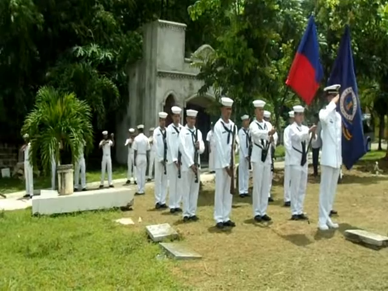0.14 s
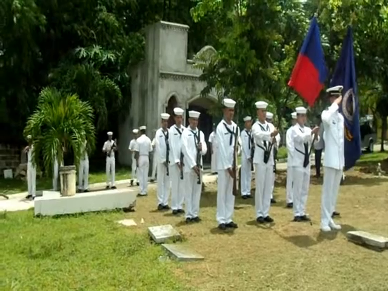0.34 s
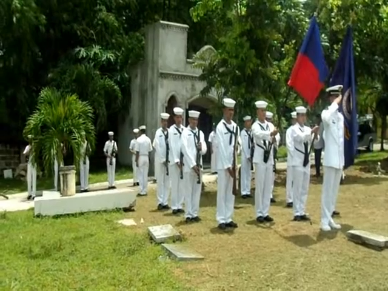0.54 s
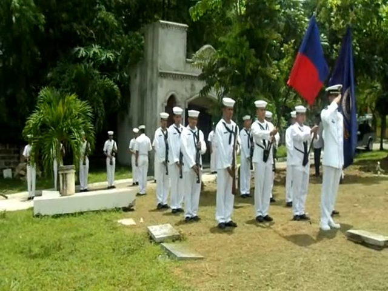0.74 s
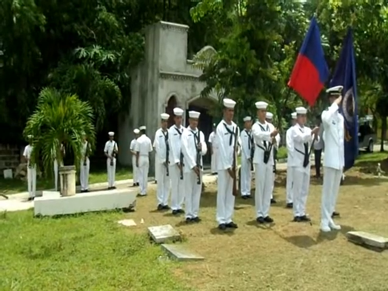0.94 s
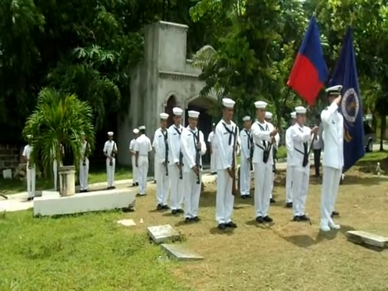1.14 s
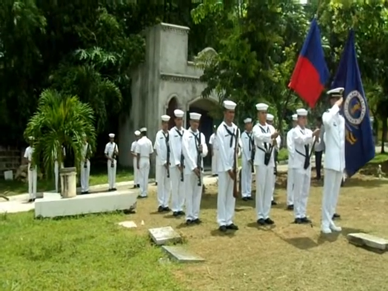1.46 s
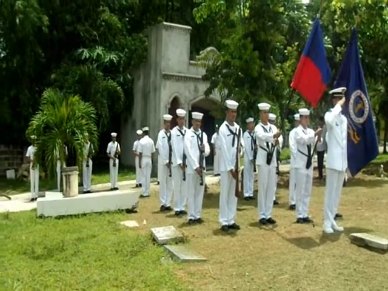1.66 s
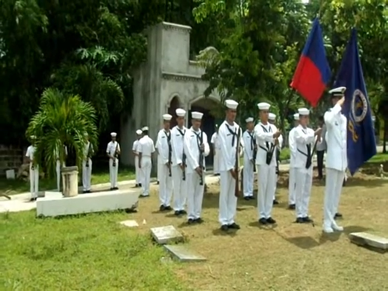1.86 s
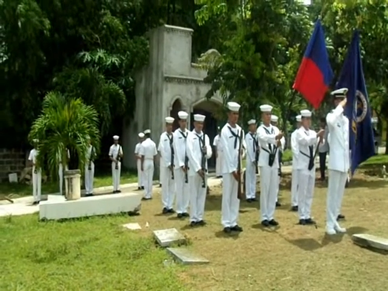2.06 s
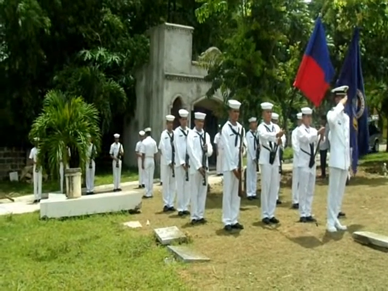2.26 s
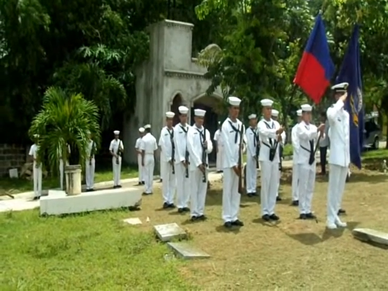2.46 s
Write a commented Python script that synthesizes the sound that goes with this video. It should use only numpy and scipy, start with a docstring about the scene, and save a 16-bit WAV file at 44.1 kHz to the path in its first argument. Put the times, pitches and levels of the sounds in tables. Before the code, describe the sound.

Three rifles fire almost as one on an open lawn, flattened and slightly dull at a small microphone; dense echoes die away, a bolt rattles, and quiet air remains with distant bird notes and insects.

```python
"""Three rifles fire almost together on a lawn, each blast a push and suction of air that overloads the microphone.
Near trees, then buildings and a far tree line scatter them back as clumpy noise; flat walls slap singly.
A bolt is worked afterwards: bursts of noise ring its steel resonances.
Behind lie filtered-noise wind rumble and hiss, a trilling and a chirping cricket, and two faint bird notes."""
import sys
import numpy as np
from scipy import signal
from scipy.fft import rfft, irfft, next_fast_len
from scipy.io import wavfile
from scipy.ndimage import uniform_filter1d, map_coordinates

SR = 44100
rng = np.random.default_rng(int(sys.argv[2]) if len(sys.argv) > 2 else 0)


def gain_from_db(level_db):
    """Convert decibel levels to linear amplitude factors (20 dB per decade)."""
    decades = np.asarray(level_db, float) / 20
    return 10 ** decades


def transcribe(signal):
    """Save signal, clipped to [-1, 1], as a 16-bit WAV file at the path in sys.argv[1]."""
    frames = np.atleast_2d(signal).T
    limited = np.clip(frames, -1, 1)
    pcm = np.round(limited * 32767).astype(np.int16)
    wavfile.write(sys.argv[1], SR, pcm)


N = 114660
T = np.arange(N) / SR

# the three muzzle blasts at the microphone: start_s, push_level_db, push_length_ms
SHOTS = [(.2074, 6, 1.1), (.2187, 1, 1.5), (.2496, 3, .6)]
# spectrum of the blast as it comes back: frequency_hz, density_db (per Hz)
BLAST_SPECTRUM = [(40, -12.5), (100, -3.5), (290, 0.5), (510, -5.5), (900, 2.5), (1600, -4), (2700, -3.5),
                  (4700, -1.5), (9000, -8.5)]


def unit(x):
    """Scales to rms 1."""
    return x / np.sqrt(np.mean(x ** 2) + 1e-20)


def along(points, hz):
    """Reads a curve of (frequency, value) points on a log frequency axis."""
    f, v = np.transpose(points)
    return np.interp(np.log(hz + 1), np.log(f + 1), v)


def wobble(rate):
    """A smooth random curve with rate knots a second."""
    return map_coordinates(rng.standard_normal(int(N * rate / SR) + 4), [T * rate])


def filtered(x, response):
    """Shapes the spectrum of x by a function of frequency in Hz."""
    m = next_fast_len(N + SR // 2)
    return irfft(rfft(x, m) * response(np.fft.rfftfreq(m, 1 / SR)), m)[..., :N]


def patchy(patchy_db):
    """White noise whose gain varies in random patches of time and frequency."""
    z = signal.stft(rng.standard_normal(N), nperseg=512)[2]
    field = rng.standard_normal(z.shape)
    for axis in (0, 1):
        field = uniform_filter1d(field, size=5, axis=axis)
    return unit(signal.istft(z * gain_from_db(patchy_db * unit(field)), nperseg=512)[1][:N])


def burst(s, t60, swell=0.00038):
    """Envelope that swells from time s and dies away by 60 dB in t60 seconds."""
    t = np.maximum(T - s, 0)
    return (1 - np.exp(-(t / swell) ** 2)) * gain_from_db(-60 * t / t60)


def blasts():
    """Each muzzle blast is a sudden push of air, then suction; once direct, once off the ground."""
    suction = .65  # share of the push
    paths = [(0, 0), (.0017, -2)]  # direct, ground bounce: (delay s, level dB)
    out = np.zeros(N)
    for start_s, level_db, length_ms in SHOTS:
        for delay_s, path_db in paths:
            s = start_s + delay_s
            v = np.maximum(T - s, 0) / (length_ms / 1000)  # time in push lengths
            pulse = (T >= s) * (1 - suction * v) * np.exp(-v)
            out += gain_from_db(level_db + path_db) * pulse
    return out


def scattered():
    """Trees and buildings return every blast as clumpy noise, with treble losses set for each."""
    # groups of scatterers; levels relative to each shot:
    # delay_s, swell_s, level_db, t60_s, treble_loss_db_per_khz, lowest_hz
    scatterers = [(.0002, .003, -9.5, 0.32, 0, 150), (.112, 0.013, -20, .6, 0, 150),
                  (.18, 0.024, -22, .6, 0.5, 90), (.3, 0.088, -36, 1.027, 2, 150),
                  (.52, 0.043, -40.5, .7, 7.5, 700), (.5, 0.16, -51, 1.7, 3.5, 1010)]
    clumpy_db, clumps_per_s = 1.2, 200
    out = np.zeros(N)
    for delay, swell, db, t60, loss_db, low_hz in scatterers:
        # the three returns add as powers
        power = sum((gain_from_db(shot_db) * burst(s + delay, t60, swell)) ** 2 for s, shot_db, _ in SHOTS)

        def response(hz):
            low_cut = hz / np.hypot(hz, low_hz)
            return gain_from_db(along(BLAST_SPECTRUM, hz) - loss_db * hz / 1000) * low_cut

        noise = unit(filtered(patchy(1.5), response))
        out += gain_from_db(db + clumpy_db * wobble(clumps_per_s)) * np.sqrt(power) * noise
    return out


def wall_slaps():
    """Flat walls give single echoes: a short noise burst over a low, fast-dying tone."""
    # single echoes: start_s, level_db
    slap_times = [(.267, -11), (.329, -17), (.349, -14), (.357, -15), (.396, -11), (.414, -14), (.431, -14),
                  (.447, -12)]
    slap_t60 = .03  # s
    boom_db, boom_hz, boom_t60 = -7, 202, 0.044  # low end: dB relative to the slap, Hz, s
    booms = np.zeros(N)
    envelope = np.zeros(N)
    for s, db in slap_times:
        envelope += gain_from_db(db) * burst(s - .001, slap_t60, 0.00062)  # the noise leads by 1 ms
        tone = np.sin(2 * np.pi * boom_hz * (T - s))
        booms += gain_from_db(db + boom_db) * burst(s, boom_t60, .002) * tone
    noise = filtered(rng.standard_normal(N), lambda hz: gain_from_db(along(BLAST_SPECTRUM, hz)))
    return booms + envelope * unit(noise)


def travelled(x):
    """The air takes more treble the longer an echo has been on its way since the first shot."""
    air_loss_db = 1.5  # per kHz and second of travel
    hz, t, z = signal.stft(x, SR, nperseg=256)
    loss_db = air_loss_db * np.outer(hz / 1000, np.maximum(t - SHOTS[0][0], 0))
    return signal.istft(z * gain_from_db(-loss_db), SR, nperseg=256)[1][:N]


def echoes():
    """Scattered returns and wall slaps, both dulled by their way through the air."""
    return travelled(scattered() + wall_slaps())


def action():
    """Steel parts of the rifle clack: short scrapes ring the bolt, answered from the lawn's edge."""
    # steel contacts (striker, bolt lifted, drawn back, rattles):
    # start_s, level_db, loudest_hz, spread_octaves, t60_s
    contacts = [(.2007, -43, 5200, .4, .025), (1.0012, -49, 5500, .1, .06), (1.002, -51, 3300, .6, .03),
                (1.0815, -30.5, 3300, .9, .035), (1.094, -42, 4200, .8, .06), (1.114, -37, 3800, .8, .03),
                (1.125, -45, 4800, .4, .03), (1.133, -43, 4800, .4, .03)]
    # resonances of the bolt: center_hz, width_hz, gain_db
    steel = [(1810, 90, 5.5), (2360, 90, 4.5), (3060, 140, -1), (3800, 130, -3), (4370, 120, -2.5),
             (4930, 140, 1.5), (5480, 100, 0), (5950, 180, 5)]
    crack_db = -9.5  # unresonant part, on the scale of the resonance gains
    wet_db, lawn_t60 = -6.5, 0.28  # answer from the lawn's edge: dB, s
    out = np.zeros(N)
    for s, db, loudest_hz, spread, t60 in contacts:
        def ringing(f):
            modes = sum(gain_from_db(g) * 1j * f * w / (c * c - f * f + 1j * f * w) for c, w, g in steel)
            focus = np.exp(-(np.log2((f + 1) / loudest_hz) / spread) ** 2)
            body = (gain_from_db(crack_db) + modes) * focus
            return unit(np.abs(body)) * np.exp(1j * np.angle(body))

        scrape = burst(s, t60) * rng.standard_normal(N)
        out += gain_from_db(db) * filtered(scrape, ringing)
    tail = rng.standard_normal(N) * burst(0.0023, lawn_t60, 0.0024)
    return out + gain_from_db(wet_db) * signal.fftconvolve(out, tail / np.linalg.norm(tail))[:N]


def crickets():
    """One trills as noise in a narrow resonance; one chirps a tone unsteady in phase and level."""
    # slow course of the trill: time_s, level_db
    trill_course = [(0, -71), (.2, -66), (1.2, -69), (1.5, -72.5), (1.7, -65), (1.86, -73), (1.9, -88.5),
                    (2.6, -79)]
    # chirps: middle_s, level_db
    chirp_times = [(1.977, -65.5), (2.11, -71), (2.163, -67.5), (2.23, -66), (2.298, -67), (2.355, -68),
                   (2.44, -70), (2.497, -66.5), (2.572, -67)]
    trill_hz, half_width_hz = 4255, 30
    pulsed_db, pulses_per_s = 2, 35  # depth and knot rate of the trill's uneven beat
    chirp_hz, chirp_s = 4310, 0.035
    trill = unit(filtered(rng.standard_normal(N), lambda hz: 1 / (1 + ((hz - trill_hz) / half_width_hz) ** 2)))
    chirps = sum(gain_from_db(db) * np.exp(-(2 * (T - s) / chirp_s) ** 4) for s, db in chirp_times)
    phase = 2 * np.pi * chirp_hz * T + .5 * wobble(60)
    tone = np.sqrt(2) * np.sin(phase) * gain_from_db(1.8 * wobble(150))
    trill_db = np.interp(T, *np.transpose(trill_course)) + pulsed_db * wobble(pulses_per_s)
    return gain_from_db(trill_db) * trill + chirps * tone


def bird():
    """Two short notes far away, each a tone falling steadily in pitch."""
    # notes: middle_s, level_db, middle_pitch_hz
    bird_notes = [(1.559, -52, 1930), (1.732, -53, 1940)]
    note_s, fall_hz_per_s = 0.016, 5400
    out = np.zeros(N)
    for s, db, hz in bird_notes:
        t = T - s
        tone = np.sin(2 * np.pi * (hz - fall_hz_per_s * t / 2) * t)
        out += gain_from_db(db) * np.exp(-(2 * t / note_s) ** 2) * tone
    return out


def air():
    """Rumble and hiss of the open air: noise split around 250 Hz, the bass coming in lumps."""
    # spectrum of the open air: frequency_hz, density_db (per Hz, relative)
    air_spectrum = [(12, -13), (22, -1), (54, -4.5), (115, -7.5), (300, -12.5), (700, -21), (1200, -26.5),
                    (2800, -33), (4500, -36), (9000, -44.5)]
    air_db = -46  # rms of both together
    low = filtered(patchy(1.5), lambda hz: gain_from_db(along(air_spectrum, hz)) / (1 + (hz / 250) ** 2))
    high = filtered(patchy(0.54), lambda hz: gain_from_db(along(air_spectrum, hz)) / (1 + (250 / (hz + 1)) ** 2))
    rumble = low * gain_from_db(.8 * wobble(8.38))
    hiss = high * gain_from_db(0.95 * wobble(1.3))
    return gain_from_db(air_db) * unit(rumble + hiss)


def scene():
    """The lawn and all around it, as one channel at the microphone."""
    return (blasts() + echoes() + action() + crickets() + bird() + air())[None]


def band_limit(x):
    """A steep low-pass at the top of the band."""
    return signal.sosfilt(signal.butter(12, 7360, fs=SR, output="sos"), x)


def record(dry):
    """The input stage flattens the blasts, then come a low band limit and a trace of hiss."""
    # microphone response: frequency_hz, gain_db
    mic_response = [(30, -0.5), (4800, 0.5), (5250, -3), (5500, -7), (5800, -7.5), (6300, -12.5),
                    (6900, -31), (7300, -46), (7700, -72.5), (12500, -74), (13500, -95), (22050, -95)]
    overload, knee = 0.51, 6.9  # amplitude ceiling, sharpness of the bend
    low_cut_hz, hiss_db = 12, -103
    flat = dry / (1 + np.abs(dry / overload) ** knee) ** (1 / knee)
    dull = filtered(flat, lambda hz: gain_from_db(along(mic_response, hz)) * 1j * hz / (low_cut_hz + 1j * hz))
    mix = dull + gain_from_db(hiss_db) * rng.standard_normal(dry.shape)
    return band_limit(mix)


dry = scene()
out = record(dry)
transcribe(out)
```